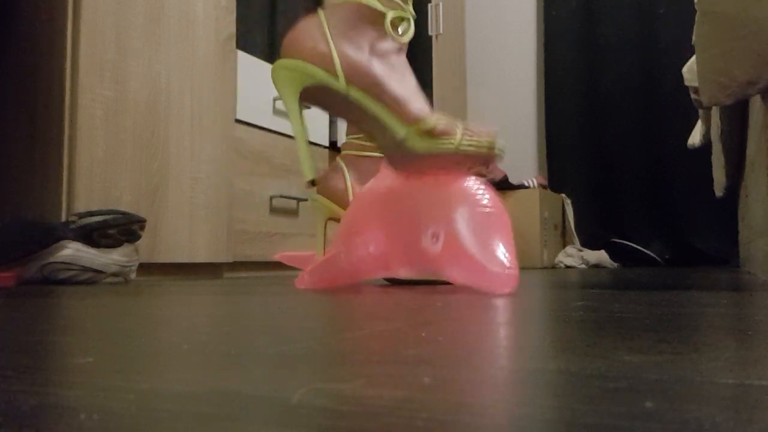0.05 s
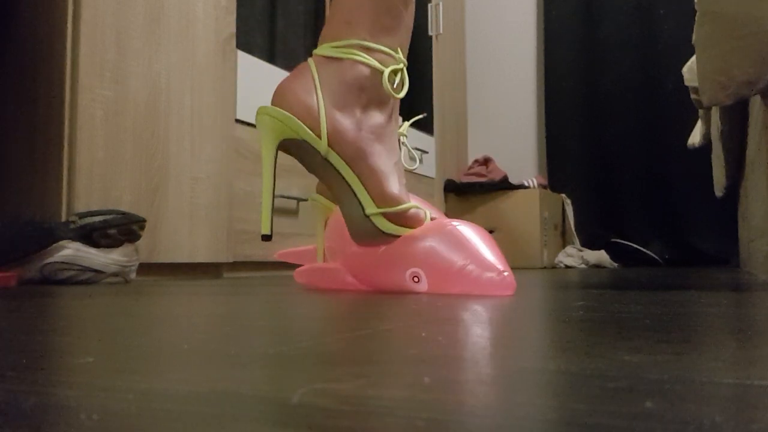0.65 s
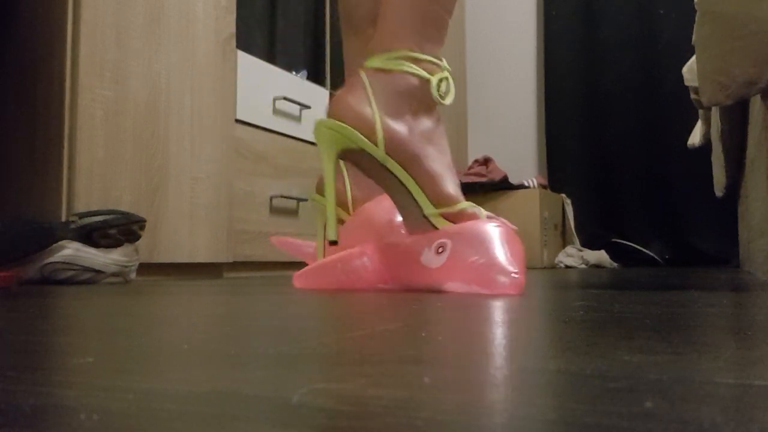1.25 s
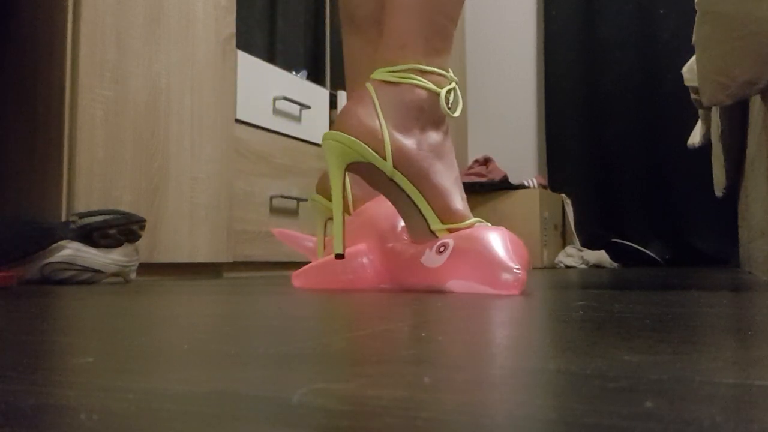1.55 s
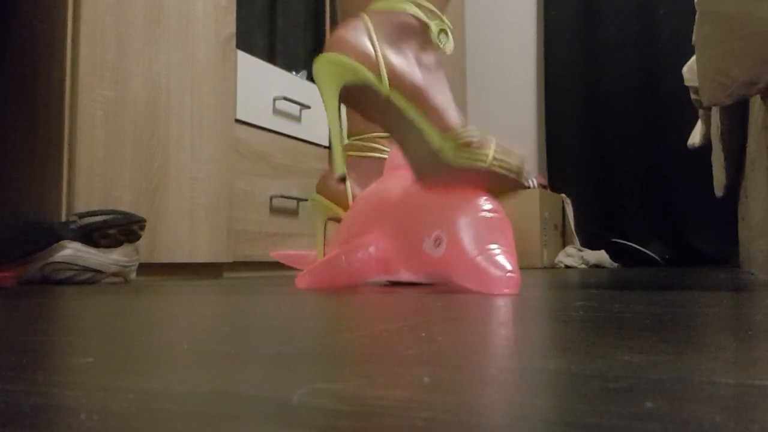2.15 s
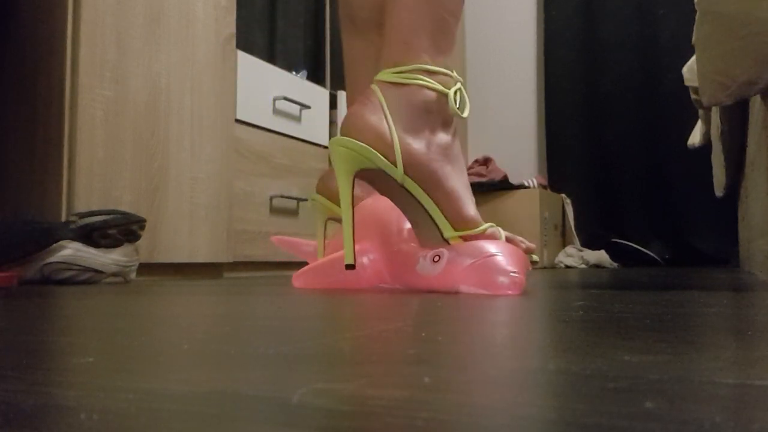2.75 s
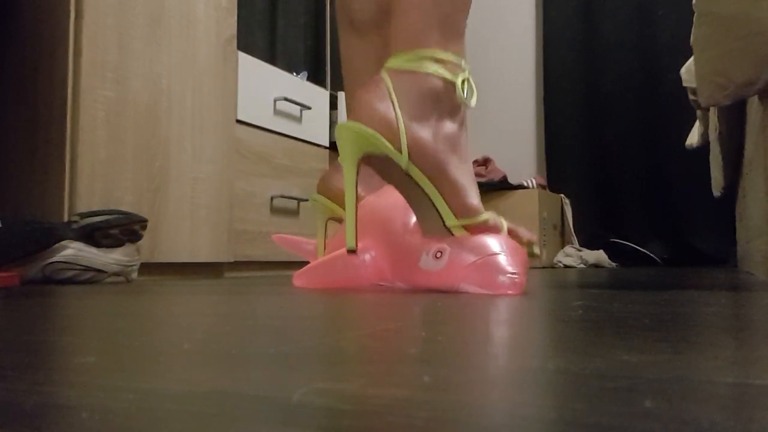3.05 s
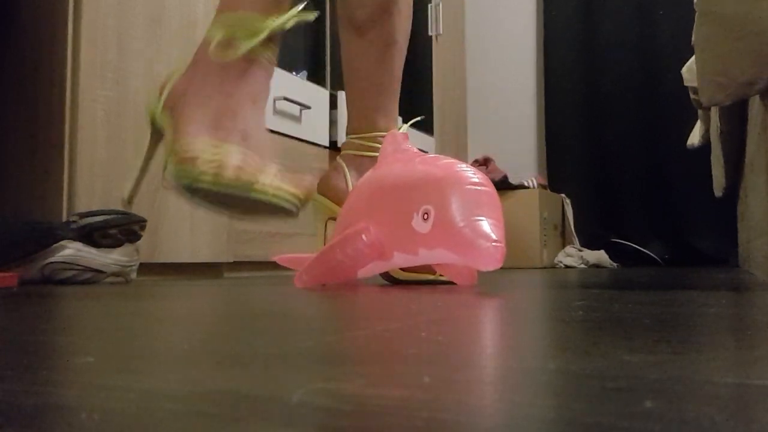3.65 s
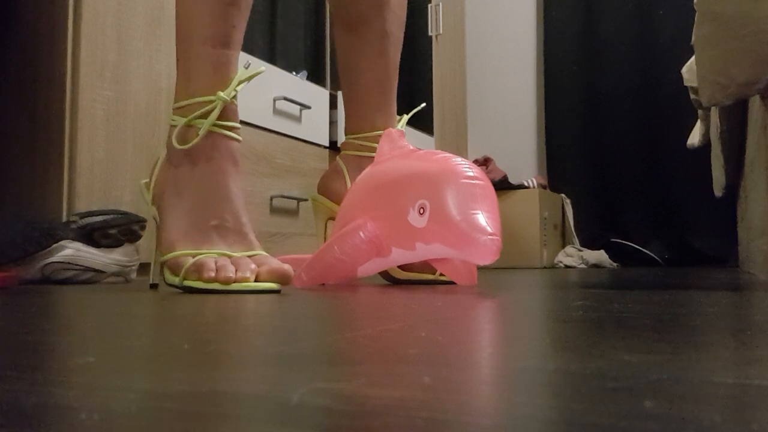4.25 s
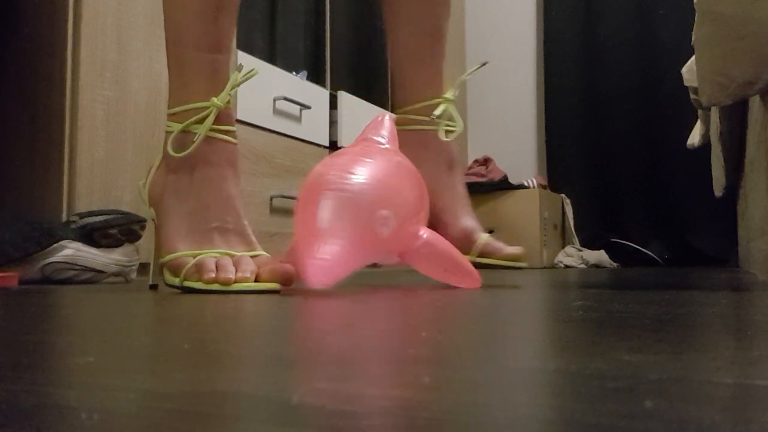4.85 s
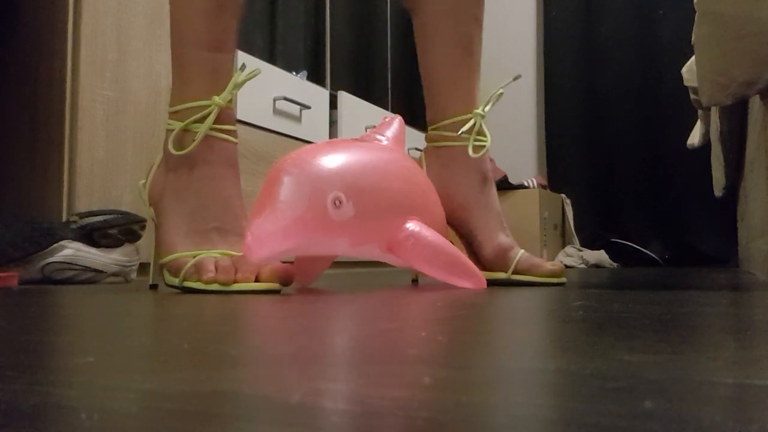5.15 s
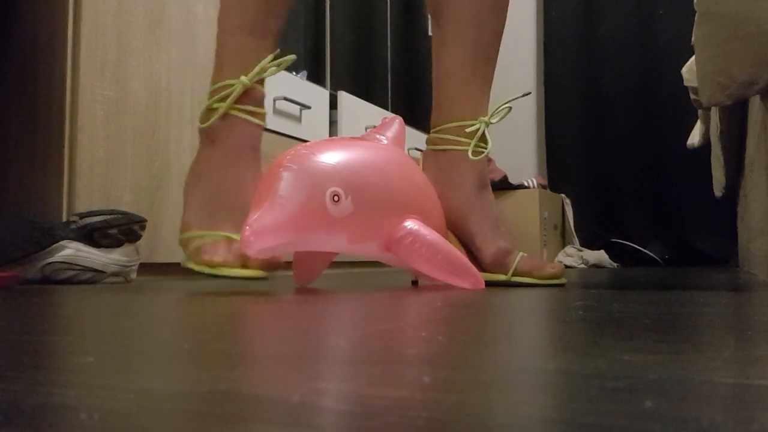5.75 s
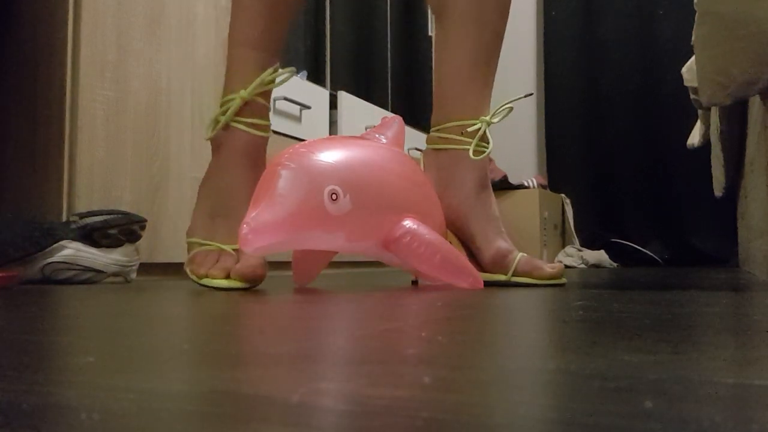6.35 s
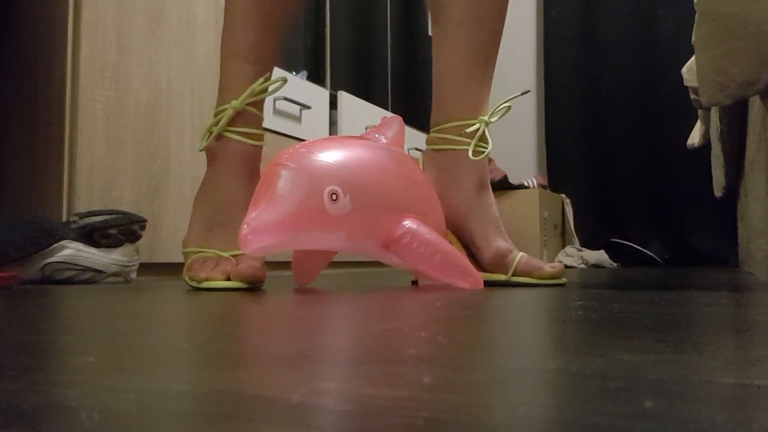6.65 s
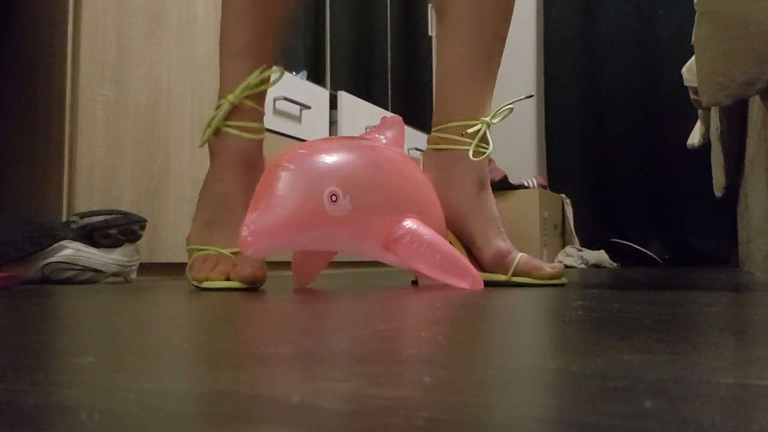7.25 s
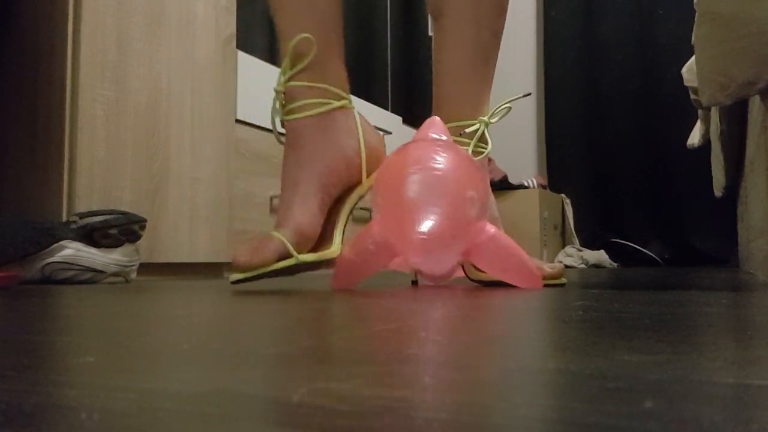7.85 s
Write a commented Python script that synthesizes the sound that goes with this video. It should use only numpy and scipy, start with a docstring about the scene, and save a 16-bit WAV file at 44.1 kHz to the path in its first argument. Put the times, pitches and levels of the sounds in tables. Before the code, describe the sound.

An inflatable vinyl toy rubs and squeaks under a heeled sandal, then heels knock on the floor and the toy scrapes across it.

```python
"""In a small bedroom, a heeled sandal treads on an inflatable vinyl toy on the laminate floor.
The sole rubs over the tight skin and squeaks as it sticks and slips, and creases snap.
Then heels knock on the boards and set them booming, soles creak, and shifting weight thumps softly.
The toy is nudged and scrapes across the floor. A faint hiss lies under it all."""
import sys
import numpy as np
from scipy import signal
from scipy.fft import rfft, irfft, next_fast_len
from scipy.io import wavfile
from scipy.ndimage import map_coordinates

SR = 44100
rng = np.random.default_rng(int(sys.argv[2]) if len(sys.argv) > 2 else 0)


def output_pcm(signal):
    """Save a mono or channel-first signal as 16-bit PCM at the path in sys.argv[1].

    Samples are clipped to [-1, 1] before scaling.
    """
    pcm = np.clip(np.atleast_2d(signal).T, -1, 1) * 32767
    wavfile.write(sys.argv[1], SR, np.round(pcm).astype(np.int16))


N = 352339
HIT_TIME = np.arange(SR // 3) / SR  # seconds into one short sound
STROKE_TIME = np.arange(SR * 3 // 5) / SR  # seconds into one rub or footfall


def amp(db):
    """Turn decibels into a number to multiply by."""
    return 10 ** (np.asarray(db) / 20)


def unit(x):
    """Scale a sound to an average strength (rms) of 1."""
    return x / np.sqrt(np.mean(x ** 2) + 1e-20)


def peaked(x):
    """Scale a sound so that its biggest swing is 1."""
    return x / np.abs(x).max()


def along(points, hz):
    """Read a table of (pitch_hz, value) at any pitch, blending between its rows."""
    pitches, values = np.transpose(points)
    return np.interp(np.log(hz + 1), np.log(pitches + 1), values)


def wobble(per_s, size):
    """A smooth curve through per_s random values each second."""
    points = rng.standard_normal(int(size * per_s / SR) + 4)
    return map_coordinates(points, [np.arange(size) * per_s / SR])


def filtered(x, gain_at):
    """Turn each pitch in a sound up or down by gain_at(hz)."""
    size = x.shape[-1]
    padded = next_fast_len(size + 8192)
    return irfft(rfft(x, padded) * gain_at(np.fft.rfftfreq(padded, 1 / SR)), padded)[..., :size]


def coloured(x, spectrum):
    """Shape a sound by a table of (pitch_hz, level_db), at an average strength of 1."""
    return unit(filtered(x, lambda hz: amp(along(spectrum, hz))))


def grit(hz, db_per_octave=-8.75):
    """A short noise, strongest around hz and weaker above and below."""
    spectrum = [(hz * 2. ** octave, db_per_octave * abs(octave)) for octave in range(-6, 7)]
    return coloured(rng.standard_normal(len(HIT_TIME)), spectrum)


def push(hz, cycles):
    """A swing that starts softly and dies fast; more cycles make it last longer."""
    turns = HIT_TIME * hz
    return peaked(turns ** 2 * np.exp(-turns / cycles) * np.sin(2 * np.pi * turns))


def envelope(rise_s, hold_s, fade_s):
    """Loudness that rises, holds, then drops 18.5 dB every fade_s."""
    fades = np.maximum(STROKE_TIME - rise_s - hold_s, 0) / fade_s
    return np.minimum(STROKE_TIME / rise_s, 1) * amp(-18.5 * fades)


def add(track, start_s, sound):
    """Mix a sound into a track at start_s."""
    part = track[..., max(round(start_s * SR), 0):][..., :sound.shape[-1]]
    part += sound[..., :part.shape[-1]]


# How long the bedroom's echo takes to fade by 60 dB: pitch_hz, ring_s
ECHO_TIMES = [(100, 0.18), (300, .17), (700, 0.22), (2000, 0.27), (5000, .24), (9000, .2), (15000, .17)]


def room(x, echo_db, right_db):
    """Add the echo off floor and wardrobes; the direct sound is right_db louder on the right."""
    hz, t, noise = signal.stft(rng.standard_normal((2, len(HIT_TIME))), SR, nperseg=256)
    alike = along([(200, 0.9), (600, .55), (1200, 0)], hz)  # long waves reach both sides alike
    spread = np.arccos(alike)[:, None] / 2
    fading = noise * amp(-60 * t / along(ECHO_TIMES, hz)[:, None])
    fading *= np.array([np.cos(spread), np.sin(spread)])
    fade_in = np.minimum(HIT_TIME / 0.0035, 1)
    mid, side = signal.istft(fading, SR, nperseg=256)[1][:, :len(HIT_TIME)] * fade_in
    echo = amp(echo_db) * np.array([mid + side, mid - side]) / np.sqrt(np.sum(mid ** 2 + side ** 2))
    echo[:, 0] += amp([-right_db / 2, right_db / 2])  # the direct sound
    return signal.fftconvolve(x[None], echo, axes=1)[:, :len(x)]


# The tone of the steady hiss: pitch_hz, level_db
HISS_TONE = [(20, -11), (45, 1.5), (70, 3.5), (120, -6), (250, -11), (500, -14), (1000, -18.5),
             (2000, -21.5), (4000, -23), (8300, -28.5), (10500, -17), (12500, -15), (15800, -17)]
# How alike the hiss is on the left and right: pitch_hz, likeness (0 to 1)
HISS_LIKENESS = [(60, 0.12), (250, 0.49), (700, 0.24), (2000, 0.089), (15000, 0.053)]


def background():
    """Room air and the microphones make a quiet, steady hiss."""
    def gain_at(hz):
        spread = np.arccos(along(HISS_LIKENESS, hz)) / 2
        return amp(along(HISS_TONE, hz)) * [np.cos(spread), np.sin(spread)]
    mid, side = filtered(rng.standard_normal((2, N)), gain_at)
    return amp(-67.5) * unit(np.array([mid + side, mid - side]))


# The tones of the four parts of a rub or ring: pitch_hz, level_db
SKIN_RASP = [(400, -20.5), (900, -12.5), (1250, 2.5), (1600, -3), (2300, 3.5), (3300, -2), (4400, -4.5),
             (5800, -4), (8000, -14.5), (12000, -16), (16000, -33.5)]
HOLLOW_BODY = [(30, -16), (70, -9), (150, -5.5), (250, 0.5), (450, 2.5), (750, 2.5), (1100, -2.5),
               (1800, -26), (4000, -54.5)]
CONTACT_FIZZ = [(3000, -32), (6000, 0.5), (8500, -6), (10500, -1), (12500, -2), (16000, -4)]
WRINKLE_CRINKLE = [(300, -10.5), (1500, -4), (4000, -2.5), (9000, -3.5), (16000, -8.5)]
# Vinyl sliding on sole or floor, plus the hollow ringing that lingers after two knocks
# (at 0.722 and 5.226 s). start_s, rise_s, hold_s, fade_s, level_db, body_boost_db, fizz_boost_db
RUBS_AND_RINGS = [(0, 0.0017, 0.019, 0.067, -53.5, -2.5, -17.5),
                  (0.058, 0.0096, 0.046, 0.17, -52, 0, -11.5), (0.201, 0.018, .2, 0.15, -63.5, 0.5, -18),
                  (0.722, 0.0067, .04, .1, -72, 16, -5.5), (0.806, 0.028, .025, .17, -56.5, -2.5, -17.5),
                  (0.952, 0.062, .025, 0.079, -42, -2, -13), (1.098, .045, 0.037, .11, -47, 1.5, -13.5),
                  (1.27, 0.027, 0.033, 0.088, -48, -1, -13.5), (1.382, .03, .07, 0.073, -69, 12, -15.5),
                  (1.576, 0.01, .025, 0.042, -61, 3, 0.5), (1.776, 0.037, 0.078, 0.19, -49.5, 0.5, -14),
                  (1.923, .035, 0.091, 0.11, -49, -0.5, -8.5), (2.19, 0.017, 0.013, 0.24, -53, 1, -8),
                  (2.469, 0.022, .02, 0.17, -57, 0.5, -13.5), (2.884, 0.026, .02, 0.069, -64.5, 5.5, -13),
                  (3.061, 0.08, .22, .09, -58.5, -2, -9.5), (3.155, 0.031, 0.0039, 0.097, -49, -2.5, -35.5),
                  (4.463, .035, 0.023, .06, -53.5, -1.5, 0.5), (4.554, 0.077, .06, .12, -55.5, -3.5, -2),
                  (4.718, .06, .12, .12, -54.5, -7, -1), (4.94, 0.029, .16, 0.22, -65, 2.5, -4),
                  (5.226, 0.043, .04, 0.1, -70, 10, -9), (5.571, 0.0099, 0.016, 0.071, -67.5, -2, 3),
                  (7.62, 0.026, 0.27, .1, -53.5, 1.5, -4), (7.751, .08, .02, .07, -44, -2.5, -12.5)]


def rubs_and_rings(wrinkles_per_s=130):
    """Countless tiny slips rasp on the skin, drum the air inside and fizz; wrinkles flick over.
    With its hollow part turned up, the same noise makes the ringing after a knock."""
    out, size = np.zeros((2, N)), len(STROKE_TIME)
    def grains(clump_db):
        return rng.standard_normal(size) * amp(clump_db * wobble(900, size) + 2 * wobble(60, size))
    for start_s, rise_s, hold_s, fade_s, level_db, body_boost_db, fizz_boost_db in RUBS_AND_RINGS:
        rasp = amp(-5.5) * coloured(grains(clump_db=5.5), SKIN_RASP)
        body = amp(body_boost_db - 5) * coloured(grains(clump_db=2.5), HOLLOW_BODY)
        fizz = amp(fizz_boost_db - 2) * coloured(grains(clump_db=1.5), CONTACT_FIZZ)
        flicks = rng.uniform(-0.88, 1, size) * (rng.random(size) < wrinkles_per_s / SR)
        crinkle = amp(-17) * coloured(flicks, WRINKLE_CRINKLE)
        sound = amp(level_db) * envelope(rise_s, hold_s, fade_s) * (rasp + body + fizz + crinkle)
        add(out, start_s, room(sound, echo_db=2.5, right_db=5.5))
    return out


# The tone of the click as two things meet: pitch_hz, level_db
CLICK_TONE = [(300, -6), (900, 12), (1500, 10.5), (2600, 5.5), (4200, -1.5), (6000, -9), (10000, -27),
              (16000, -27.5)]
# The low notes of the floorboards: pitch_hz, level_db, ring_s (time to fade by 60 dB)
BOARD_NOTES = [(56.6, -5, 0.2), (88, -2, .3), (122, 1.5, 0.12), (152, -6, 0.088), (212.2, -4.5, 0.18),
               (235, -12.5, 0.59)]
# Heels and toy hitting the floor; bounce_db compares the first bounce with the hit.
# start_s, level_db, pitch_hz, boom_db, click_db, bounce_db, bounce_gap_s
FLOOR_KNOCKS = [(.079, -41, 390, -48.5, -40, -9, .012), (.637, -46.5, 290, -45, -59.5, 5.5, 0.013),
                (.725, -26, 352, -65.5, -64, -21, 0.012), (2.244, -38.5, 337, -54, -54, -18, .012),
                (2.272, -36.5, 556, -67, -47, -24, 0.0083), (2.681, -55, 780, -74, -45, -8, 0.0083),
                (2.892, -46, 577, -55, -43.5, -1, 0.02), (3.029, -45.5, 565, -70, -51, -5, 0.01),
                (3.113, -44, 624, -79, -44, -13, 0.013), (4.042, -49.5, 600, -55.5, -46.5, 0, 0.013),
                (4.141, -36, 470, -45, -51, 1, .016), (4.254, -35, 548, -55.5, -60, -2.5, .013),
                (4.468, -41, 575, -60, -45, -10.5, 0.014), (4.529, -45.5, 460, -54.5, -42.5, -1.5, .012),
                (4.9383, -31, 395, -58, -37, -19.5, 0.016), (5.1593, -27.5, 630, -51, -28.5, -2, .021),
                (5.215, -16.5, 582, -45.5, -29, -6, .012), (5.471, -52.5, 436, -66, -72, -6, .012),
                (5.582, -52.5, 770, -86, -49, -2.5, .015), (6.147, -35.5, 614, -56.5, -44, -4.5, 0.013),
                (6.66, -65, 700, -82, -56.5, -14, .012), (7.749, -34.5, 400, -68, -38, -14, .012),
                (7.823, -18.5, 369, -38.5, -29.5, -29, 0.018), (7.969, -24.5, 630, -50, -30.5, -15, 0.01)]


def knocks(bounces=3, bounce_loss_db=6):
    """Each blow is a hollow knock with a click; it rattles to rest and sets the boards booming."""
    out, t = np.zeros((2, N)), HIT_TIME
    for start_s, level_db, pitch_hz, boom_db, click_db, bounce_db, bounce_gap_s in FLOOR_KNOCKS:
        slow_bend = amp(-9) * push(pitch_hz * .36, cycles=0.13)  # the board gives under the blow
        swing = push(pitch_hz, cycles=0.23) + slow_bend
        # the contact takes a moment, which cuts off the highs
        soften = signal.butter(6, pitch_hz * 1.9, fs=SR, output="sos")
        hit = amp(level_db) * peaked(signal.sosfilt(soften, swing))
        knock = hit.copy()
        for k in range(bounces):
            delay_s = (k + 1 + k * rng.normal(0, .2)) * bounce_gap_s
            add(knock, delay_s, amp(bounce_db - k * bounce_loss_db) * hit)
        click_noise = coloured(rng.standard_normal(len(t)), CLICK_TONE)
        click = amp(click_db) * peaked(click_noise * amp(-60 * t / 0.024))
        boards = sum(amp(db + rng.normal(0, 1.3) - 60 * t / ring_s) * np.sin(2 * np.pi * hz * t)
                     for hz, db, ring_s in BOARD_NOTES)
        boom = amp(boom_db) * peaked(boards * (1 - np.exp(-t / 0.0075)))
        add(out, start_s, room(knock + click, echo_db=0.5, right_db=2.5) + boom)
    return out


# How strongly the tight skin gives off each pitch: pitch_hz, boost_db
SKIN_BOOST = [(1500, -4.5), (2300, 0), (3000, 2), (3400, 2), (3750, -8), (4700, -3), (5850, 0.5),
              (7400, 2.5), (9000, -0.5), (12000, -5)]
# The sole squeaking on the toy. Second and third are overtones, set against the main tone;
# the dips make the two ends quieter. start_s, rise_s, fall_s, start_hz, crest_hz, end_hz,
# arch_power, level_db, second_db, third_db, start_dip_db, end_dip_db
SOLE_SQUEAKS = [(.24, 0.03, 0.048, 1920, 2240, 1600, 2, -55, 0.5, -14, 5, 6.5),
                (1.071, 0.025, 0.0092, 2380, 3780, 3950, 1.3, -35.5, 2.5, -13, 18, 1),
                (1.107, 0.014, .003, 3880, 4530, 4500, 1, -47, 19.5, -25, 2.5, 5),
                (1.117, 0.011, 0.075, 5700, 5850, 2220, 2.46, -29, -2.5, -35, 7, 19),
                (1.285, 0.037, .038, 2016, 2903, 2325, 2, -43, -1.5, -10.5, 15, 4),
                (1.79, 0.06, .088, 2330, 3704, 1984, 2.86, -38, 0.5, -17.5, 15.5, 7.5),
                (2.477, 0.018, 0.051, 2054, 2330, 1925, 1.7, -53.5, -13, -19, 0, 5),
                (2.491, 0.0123, 0.082, 4130, 3960, 3710, 1.04, -49.5, -15, -28, 1, 12),
                (3.125, 0.068, 0.051, 1885, 2207, 1700, 2, -53, 1.5, -17, 9, 5),
                (3.31, 0.0078, 0.12, 1850, 1776, 1313, 2.4, -59.5, -11, -10, 4, 22),
                (7.348, .014, .025, 2480, 2640, 2380, 1.5, -70, -21, -27, 9, 4)]


def squeaks(flutter_db=3, fade_s=0.0026, overtone_dip=1.6):
    """The sole sticks and slips on vinyl; pitch, loudness and brightness follow the sliding speed."""
    out, t = np.zeros((2, N)), HIT_TIME
    for (start_s, rise_s, fall_s, start_hz, crest_hz, end_hz,
         arch_power, level_db, second_db, third_db, start_dip_db, end_dip_db) in SOLE_SQUEAKS:
        off_crest = np.interp(t, [0, rise_s, rise_s + fall_s], [1, 0, 1]) ** arch_power
        pitch_hz = crest_hz + off_crest * (np.where(t < rise_s, start_hz, end_hz) - crest_hz)
        # the pitch turns ragged where the sole slides slowly or presses lightly
        slowness = np.minimum(1 - pitch_hz / pitch_hz.max(), .25)
        lightness = np.clip((-38 - level_db) / 10, 0, 1)
        ragged = 0.007 + .09 * slowness + 0.015 * lightness
        phase = 2 * np.pi * np.cumsum(pitch_hz * (1 + ragged * wobble(1000, len(t)))) / SR
        dip_db = off_crest * np.where(t < rise_s, start_dip_db, end_dip_db)
        parts_db = [-dip_db, second_db - overtone_dip * dip_db, third_db - overtone_dip * dip_db]
        tone = np.zeros(len(t))
        for k, part_db in enumerate(parts_db, 1):
            smooth_db = level_db + part_db + along(SKIN_BOOST, k * pitch_hz)
            tone += amp(smooth_db + flutter_db * wobble(228, len(t))) * np.sin(k * phase)
        grip = np.clip(np.minimum(t, rise_s + fall_s + fade_s - t) / fade_s, 0, 1)
        add(out, start_s, room(tone * grip, echo_db=-1.5, right_db=5.5))
    return out


# Creases snapping and heel tips ticking: start_s, level_db, pitch_hz
SNAPS_AND_TICKS = [(.311, -45, 10000), (.3608, -34, 10200), (.718, -44.5, 12900), (2.2255, -37.5, 5000),
                   (2.2416, -27.5, 12500), (2.244, -34, 12100), (2.272, -31.5, 2800), (2.297, -44, 11000),
                   (2.498, -41, 10900), (2.683, -32, 4820), (3.219, -40.5, 12000), (3.265, -46.5, 10500),
                   (3.317, -42.5, 6980), (4.380, -38.5, 4240), (4.46, -40, 3280), (4.497, -31.5, 10500),
                   (5.1716, -38, 2640), (5.291, -45.5, 12570), (5.395, -42, 9340), (5.7182, -36.5, 4700),
                   (6.661, -43, 4100), (7.629, -41.5, 9100)]


def snaps(volume_db=-2):
    """A crease or heel tip lets go with one sharp flick and a dry crack."""
    out = np.zeros((2, N))
    for start_s, level_db, pitch_hz in SNAPS_AND_TICKS:
        crack = peaked(grit(pitch_hz) * amp(-60 * HIT_TIME / 0.015))
        snap = peaked(.8 * push(pitch_hz, cycles=.2) + crack)
        add(out, start_s, room(amp(level_db + volume_db) * snap, echo_db=0, right_db=5.5))
    return out


# Soles creaking and catching on the boards: start_s, length_s, level_db, pitch_hz
SOLE_SCUFFS = [(2.154, .032, -44.5, 1290), (4.517, 0.023, -44, 3080), (4.663, 0.058, -44.5, 2860),
               (4.151, 0.0375, -65.5, 4640), (5.496, .04, -65, 4550), (5.595, .023, -62, 1770),
               (5.982, 0.026, -66.5, 1300), (6.933, 0.049, -68, 1828), (7.219, 0.016, -72, 5330),
               (7.235, .03, -61.5, 960), (7.352, 0.027, -67.5, 1363)]


def scuffs(volume_db=-9.5):
    """A sole with weight on it creeps a little, making a quick, grainy scrape."""
    out = np.zeros(N)
    for start_s, length_s, level_db, pitch_hz in SOLE_SCUFFS:
        progress = np.minimum(HIT_TIME / length_s, 1)
        swell = peaked(np.sqrt(progress) * (1 - progress))
        grain = amp(level_db + 4.5 * wobble(330, len(HIT_TIME)))
        add(out, start_s, grain * grit(pitch_hz) * swell)
    return amp(volume_db) * room(out, echo_db=3, right_db=4.5)


# The tone of the bending floor: pitch_hz, level_db
RUMBLE_TONE = [(25, -31), (42, 2), (75, 1), (120, -9.5), (200, -25), (500, -34), (1500, -57)]
# Soft steps on the floor: start_s, thump_db, pitch_hz, rumble_db
FOOTFALLS = [(5.925, -42.5, 75.6, -52.5), (6.092, -47, 72.7, -56), (6.475, -55.5, 78.6, -66.5),
             (6.629, -56, 75.7, -66), (7.036, -47.5, 116.6, -50.5), (7.089, -46, 63.6, -70),
             (7.132, -52, 57.4, -57.5), (7.36, -52.5, 66, -56)]


def footfalls():
    """Shifting weight makes the floor thump, then rumble as it bends."""
    out = np.zeros(N)
    bend = envelope(rise_s=0.016, hold_s=0.032, fade_s=0.29)
    for start_s, thump_db, pitch_hz, rumble_db in FOOTFALLS:
        rumble = coloured(rng.standard_normal(len(STROKE_TIME)), RUMBLE_TONE)
        add(out, start_s, amp(rumble_db) * bend * rumble)
        add(out, start_s, amp(thump_db) * push(pitch_hz, cycles=0.8))
    return out * amp([[-.6], [.6]])  # a little louder on the right


def scene():
    """Toy, feet and room together."""
    return background() + rubs_and_rings() + knocks() + squeaks() + snaps() + scuffs() + footfalls()


def record(dry):
    """Turn down the deepest bass and cut off the very highest treble."""
    bass_cut = signal.butter(4, 42, "highpass", fs=SR, output="sos")
    return filtered(signal.sosfilt(bass_cut, dry), lambda hz: hz < 15900)


dry = scene()
out = record(dry)
output_pcm(out)
```